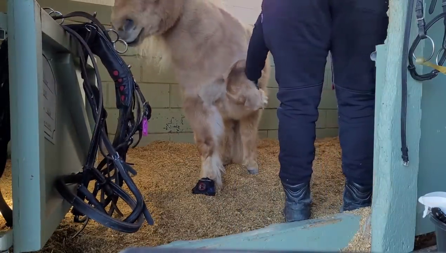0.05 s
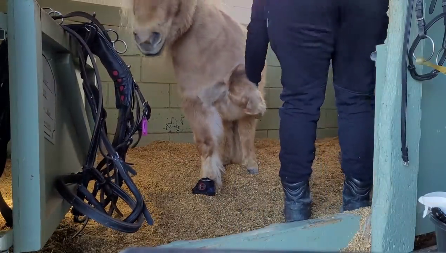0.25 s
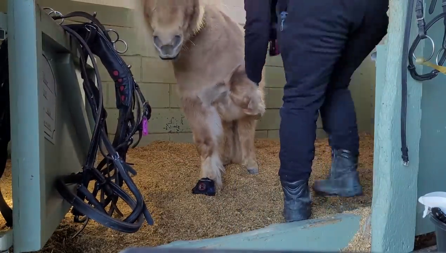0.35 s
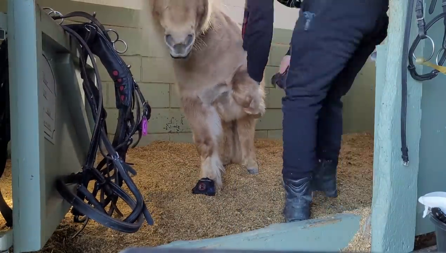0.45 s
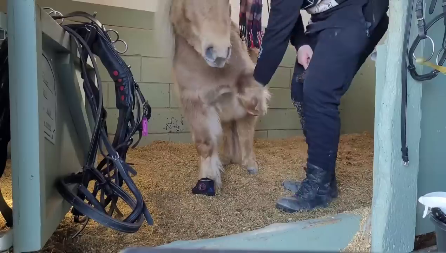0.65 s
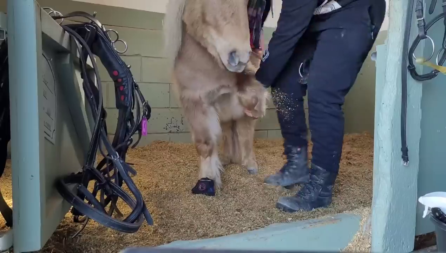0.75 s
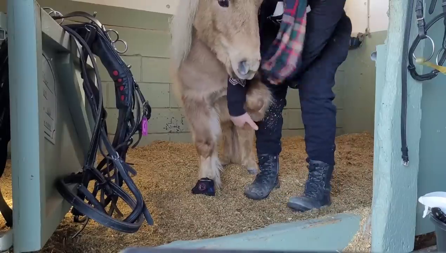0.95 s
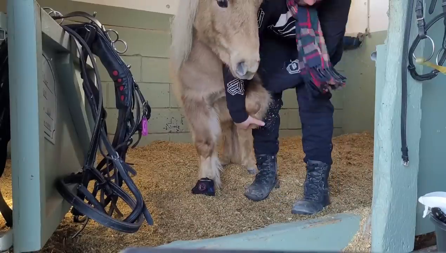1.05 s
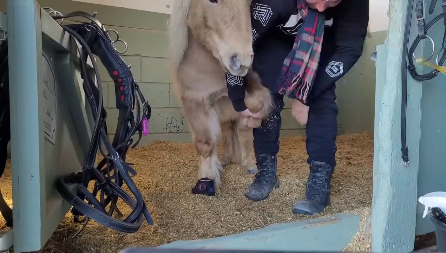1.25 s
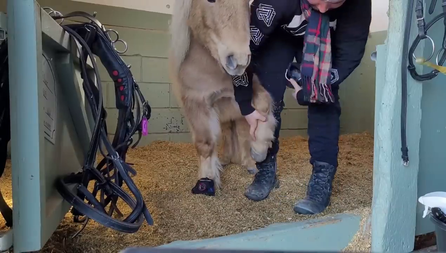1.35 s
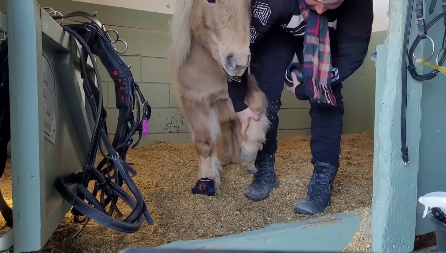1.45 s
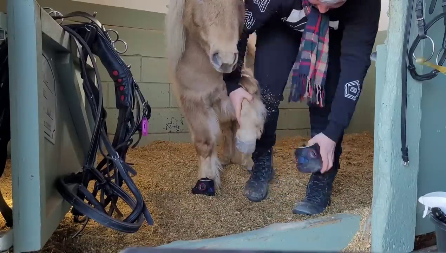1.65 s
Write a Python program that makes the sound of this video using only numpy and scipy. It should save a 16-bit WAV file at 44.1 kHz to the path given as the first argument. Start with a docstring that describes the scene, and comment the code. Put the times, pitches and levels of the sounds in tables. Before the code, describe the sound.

One dull boot knock on a wooden stall panel, followed by soft rustling above a wavering motor hum

```python
"""A low motor hum wavers over room rumble and hiss; then a boot knocks hollowly on a wooden panel in a
pony's straw-bedded stall. Smooth pushes ring the modes of panel and floor boards while grit crunches.
Afterwards straps tick as short runs of touches, and clothes and bedding rustle as bands of random grains.
Feedback delays give the near sounds the short echo of the stall."""
import sys
import numpy as np
from scipy import signal
from scipy.io import wavfile

SR = 44100
rng = np.random.default_rng(int(sys.argv[2]) if len(sys.argv) > 2 else 0)


def boost_factor(decibels):
    """Convert a level in decibels to a linear amplitude factor."""
    exponent = np.asarray(decibels, float) / 20
    return 10 ** exponent


def wav_out(sig):
    """Save sig, one row per channel (or a flat mono array), as 16-bit PCM at SR to the path in sys.argv[1]."""
    wavfile.write(sys.argv[1], SR, np.round(np.clip(np.atleast_2d(sig).T, -1, 1) * 32767).astype(np.int16))


N = 74970


def rms_one(x):
    """Scales a signal to rms 1."""
    return x / np.sqrt(np.mean(x ** 2) + 1e-20)


def in_time(points):
    """Draws straight lines through (seconds, dB) points, one value per sample."""
    seconds, db = np.transpose(points)
    return np.interp(np.arange(N) / SR, seconds, db)


def at_hz(points, hz):
    """Reads a curve of (Hz, value) points, straight over log frequency."""
    point_hz, value = np.transpose(points)
    return np.interp(np.log(hz), np.log(point_hz), value)


def pan(db):
    """Left and right gains that differ by db, positive = left louder."""
    return boost_factor(np.array([[db / 2], [-db / 2]]))


def band(x, low_hz, high_hz):
    """Gentle band-pass."""
    sos = signal.butter(2, [low_hz, min(high_hz, .45 * SR)], "band", fs=SR, output="sos")
    return signal.sosfilt(sos, x)


def cut(x, hz, kind):
    """Steeper low-pass or high-pass."""
    return signal.sosfilt(signal.butter(3, hz, kind, fs=SR, output="sos"), x)


def drift(rate_hz):
    """Slow random wander with spread 1: noise through two equal poles, computed every 40 samples."""
    pole = np.exp(-2 * np.pi * rate_hz * 40 / SR)
    noise = rng.standard_normal(N // 40 + 2002)
    slow = signal.lfilter([1], [1, -2 * pole, pole * pole], noise)[2000:]  # drop the settling
    return np.interp(np.arange(N) / 40, np.arange(len(slow)), rms_one(slow))


def ring(x, hz, t60):
    """A damped resonator: a unit click sets a sine of height about 1 ringing, down 60 dB after t60 seconds."""
    decay = boost_factor(-60 / (t60 * SR))
    turn = 2 * np.pi * hz / SR
    return signal.lfilter([0, np.sin(turn)], [1, -2 * decay * np.cos(turn), decay * decay], x + 1e-18)


def banded_noise(spectrum, patchy_db):
    """Half-octave bands of stereo noise, each with its level, flicker, likeness and balance; rms 1."""
    # How alike the ears are. Each row: frequency in Hz, left-right correlation (no unit).
    alike_curve = [(30, 0.25), (60, 0.63), (290, 0.87), (640, 0.23), (1400, 0.013)]
    # Stereo balance of the noise. Each row: frequency in Hz, left minus right in dB.
    balance_curve = [(60, 2.5), (1000, -2), (4000, 2)]
    edges = 20 * 2 ** np.arange(0, 10.1, .5)
    white = rng.standard_normal((2, 2, N + SR // 2))
    out = 0
    for k, (low, high) in enumerate(zip(edges, edges[1:])):
        # neighbouring bands use different noise; the first half second lets the filter settle
        mid, side = band(white[k % 2], low, high)[:, SR // 2:]
        hz = np.sqrt(low * high)
        alike = np.clip(at_hz(alike_curve, hz), -1, 1)
        stereo = np.sqrt(1 + alike) * mid + np.sqrt(1 - alike) * side * [[1], [-1]]
        level_db = at_hz(spectrum, hz) + patchy_db * drift(3.6)
        out = out + boost_factor(level_db) * pan(at_hz(balance_curve, hz)) * stereo
    return rms_one(out)


def grains():
    """Dense random clicks of uneven size, unrelated in the two channels; rms 1."""
    grains_per_s, spread_db = 4600, 3.5
    size_db = spread_db * np.minimum(rng.exponential(1, (2, N)), 4)
    clicks = boost_factor(size_db) * rng.choice([-1, 1], (2, N))
    return rms_one(clicks * (rng.random((2, N)) < grains_per_s / SR))


def struck(contacts, modes, low_cut_hz):
    """Smooth bell-shaped pushes, each of unit area times its level, ring every mode of a wooden body."""
    ear_spread_db = .5  # each ear hears each mode a little differently
    t = np.arange(N) / SR
    push = np.zeros(N)
    for s, db, width_ms in contacts:
        sigma = width_ms / 4000  # seconds; a negative width turns the push the opposite way
        push += boost_factor(db) * np.exp(-.5 * ((t - s) / sigma) ** 2) / (sigma * SR * np.sqrt(2 * np.pi))
    body = np.zeros((2, N))
    for hz, db, t60, left_minus_right_db in modes:
        ear_gain = boost_factor(db + rng.normal(0, ear_spread_db, (2, 1))) * pan(left_minus_right_db)
        body += ring(push, hz, t60) * ear_gain
    return cut(body, low_cut_hz, "high")


def shuffle(level, low_hz, high_hz, patchy_db):
    """Grains in a band with a steep top, flickering around a level curve."""
    grain = band(grains(), low_hz, high_hz)
    grain = cut(cut(grain, high_hz, "low"), high_hz, "low")
    return boost_factor(in_time(level) + patchy_db * drift(9.2)) * rms_one(grain)


def room():
    """Steady rumble and hiss, shaped from noise bands that hardly flicker."""
    # Rumble and hiss. Each row: frequency in Hz, relative level per Hz in dB.
    room_spectrum = [(12, -42), (25, -1.5), (47, -3), (70, -0.5), (90, -6), (116, -7.5), (405, -17),
                     (688, -27.5), (1720, -53.5), (2150, -53), (4500, -62), (7000, -58.5), (15600, -58)]
    return boost_factor(-48) * banded_noise(room_spectrum, patchy_db=0.2)


def hum():
    """A motor's few harmonic orders of one wavering pitch, each fluttering on its own."""
    # Swells of the hum. Each row: time in seconds, level in dB.
    hum_level = [(0, -49), (.17, -43.5), (.5, -51.5), (.72, -43), (.78, -49.5), (.99, -42), (1.09, -46.5),
                 (1.35, -46), (1.7, -49.5)]
    # Harmonics of the hum. Each row: multiple of the pitch (no unit), relative level in dB.
    hum_orders = [(1, -0.5), (2, -15), (3, -25), (4, -23.5)]
    pitch_hz = 67.05 + 1.4 * drift(2.5)
    phase = np.pi / 2 + 2 * np.pi * np.cumsum(pitch_hz) / SR
    tone = np.zeros(N)
    for order, db in hum_orders:
        flutter_db = 2.27 * np.sqrt(order) * drift(9)  # higher orders flutter more
        tone += boost_factor(db + flutter_db) * np.cos(order * phase)
    return np.sqrt(2) * boost_factor(in_time(hum_level)) * tone * pan(-3)


def bedding():
    """Feet shuffling in the bedding: a mid-range band of grains."""
    # Shuffling feet. Each row: time in seconds, level in dB.
    stir_level = [(.4, -109), (.46, -73), (.6, -77.5), (.72, -71.5), (.97, -68.5), (1.1, -69),
                  (1.25, -69.5), (1.35, -78), (1.7, -75)]
    return shuffle(stir_level, low_hz=700, high_hz=2150, patchy_db=1.5)


def cloth():
    """Thin swish of clothes in motion: a higher, fainter band of grains."""
    # Swishing clothes. Each row: time in seconds, level in dB.
    cloth_level = [(0.4, -100), (.5, -85), (.66, -88), (.8, -83.5), (1.1, -85), (1.3, -87.5), (1.52, -86.5),
                   (1.58, -100)]
    return shuffle(cloth_level, low_hz=2500, high_hz=8000, patchy_db=2)


def rustles():
    """Cloth and straw: grains twice through a band, under an uneven swell that starts faster than it ends."""
    # Each row: middle in seconds, length in seconds, level in dB, centre in Hz, width in octaves.
    rustle_rows = [(0.082, .05, -81.5, 7440, 1.24), (.489, 0.025, -64.5, 1875, 0.2),
                   (0.49, 0.026, -79, 4000, 0.6), (0.603, 0.15, -79, 13200, .7),
                   (0.62, 0.13, -84, 7350, 0.64), (0.968, 0.022, -73.5, 2500, 0.6),
                   (1.008, 0.041, -64.5, 2500, 0.81), (1.028, 0.041, -83, 4460, 0.15),
                   (1.168, 0.045, -79, 4640, 1.5), (1.157, .025, -87, 5700, 0.18),
                   (1.274, 0.027, -72, 4370, 1.7), (1.262, 0.036, -86, 5500, 0.17),
                   (1.377, .035, -78, 12000, 2.6), (1.38, 0.038, -64, 883, 0.6),
                   (1.455, 0.038, -71, 12400, .7), (1.459, 0.017, -73, 3650, 1.5),
                   (1.504, 0.029, -66, 1040, 0.53), (1.505, 0.028, -71.5, 4120, 2.5)]
    t = np.arange(N) / SR
    grain = grains() * boost_factor(3.5 * drift(39))  # quick patchiness
    out = np.zeros((2, N))
    for s, length, db, hz, octaves in rustle_rows:
        low, high = hz * 2 ** (-octaves / 2), hz * 2 ** (octaves / 2)
        swell = np.exp(-np.abs(2 * (t - s) / length) ** np.where(t < s, 4, 2))
        out += boost_factor(db) * swell * rms_one(band(band(grain, low, high), low, high))
    return out


def ticks():
    """Straps and buckles: a quick run of four touches rings one mode, reaching the ears slightly apart."""
    # Each row: start in seconds, level of a touch in dB, pitch in Hz, t60 in seconds.
    tick_rows = [(0.344, -69, 12900, 0.0045), (0.432, -68.5, 12000, 0.0015), (.488, -56.5, 1210, 0.018),
                 (.593, -49, 700, 0.0048), (0.717, -51.5, 1260, 0.01), (.970, -45, 544, 0.037),
                 (1.226, -44.5, 1200, 0.0026), (1.422, -61.5, 11100, 0.0018), (1.454, -51.5, 900, 0.015),
                 (1.463, -51, 785, 0.011), (1.497, -60, 890, 0.0087)]
    run_s = .004
    out = np.zeros((2, N))
    for s, db, hz, t60 in tick_rows:
        touch_s = s + (np.arange(4) + rng.random((2, 4))) * run_s / 4
        click = np.zeros((2, N))
        click[[[0], [1]], (touch_s * SR).astype(int)] = boost_factor(db)
        out += band(ring(click, hz, t60), hz * .6, hz * 1.6)
    return out


def crunch():
    """Grit crunching during the knock: noise that rises, holds briefly and dies away."""
    # Colour of the grit. Each row: frequency in Hz, relative level per Hz in dB.
    crunch_spectrum = [(470, -29), (800, 0), (1490, -17.5), (2270, -22.5), (3680, -47), (4650, -28.5),
                       (15500, -88)]
    start_s, rise_s, hold_s, t60_s = 0.2315, 0.014, 0.0063, 0.1
    age = np.arange(N) / SR - start_s
    rise = np.clip(age / rise_s, 0, 1)
    fall = boost_factor(-60 * np.maximum(age - rise_s - hold_s, 0) / t60_s)
    return boost_factor(-34.5) * rise * fall * banded_noise(crunch_spectrum, patchy_db=2.5)


def floor_boards():
    """One short opposite push, then three pushes of weight, make the low modes of the floor boards boom."""
    # Thumps of weight. Each row: time in seconds, level in dB, contact width in ms
    # (negative = opposite push).
    thumps = [(.2465, -24, -1), (.2545, -32, 1.5), (.2785, -19.5, 4.5), (.316, -34, 3)]
    # Modes of the boards. Each row: frequency in Hz, level in dB, t60 in seconds, left minus right in dB.
    board_modes = [(80, 2.5, 0.2, -2.5), (114.5, 2.5, 0.16, -3.5), (238, -6.5, 0.093, 2)]
    return struck(thumps, board_modes, low_cut_hz=52)


def panel_knock():
    """The boot's contacts ring the modes of the hollow wooden panel."""
    # Contacts of the boot. Each row: time in seconds, level in dB, contact width in ms (negative = pull).
    knocks = [(.054, -32, 3), (.0612, -33.5, 3.5), (.2335, -20, 1.2), (0.2376, -20, -0.95),
              (.2436, -12, 1.8), (.2474, -6, 1.33), (.2565, -7.5, 2.5)]
    # Modes of the panel. Each row: frequency in Hz, level in dB, t60 in seconds, left minus right in dB.
    panel_modes = [(203.6, -28.5, 0.15, 4.5), (250.8, -15.5, 0.14, -3), (309.3, -1, 0.046, 0.5),
                   (405, -15.5, 0.093, -7), (454, -16, 0.087, -5), (491.4, -8.5, 0.089, -10.5),
                   (622, -12.5, 0.1, 0.5), (817.4, -12, 0.049, -8.5), (994, -15.5, 0.042, 9),
                   (1130, -21.5, 0.098, -15.5), (1310, -12, 0.088, -6)]
    return struck(knocks, panel_modes, low_cut_hz=65)


def stall(x):
    """Echo of the stall: six feedback delays a side, duller on every round."""
    t60_s, wall_hz = 0.15, 2500
    dull = np.exp(-2 * np.pi * wall_hz / SR)
    lags = (np.geomspace(.009, .029, 12) * SR).astype(int)
    out = np.zeros((2, N))
    for k, lag in enumerate(lags):
        gain = boost_factor(-60 * lag / SR / t60_s)
        loop, state = x.copy(), [0.]
        for i in range(lag, N, lag):
            back, state = signal.lfilter([gain * (1 - dull)], [1, -dull], loop[i - lag:i], zi=state)
            loop[i:i + lag] += back[:N - i]
        out[k % 2] += (loop - x) * (-1) ** (k // 2)  # echoes only, in alternating polarity
    return out


def scene():
    """Near sounds with their echoes, over hum, shuffling and room noise."""
    background = room() + hum() + bedding() + cloth()
    near = rustles() + ticks() + crunch() + floor_boards() + panel_knock()
    echoes = boost_factor(-18.5) * stall(near.mean(axis=0))
    return background + near + echoes


def band_limit(x):
    """A steep low-pass at the top of the band."""
    return signal.sosfilt(signal.butter(12, 15720, fs=SR, output="sos"), x)


def record(dry):
    """Hands on the finished mix."""
    return band_limit(dry)


dry = scene()
out = record(dry)
wav_out(out)
```